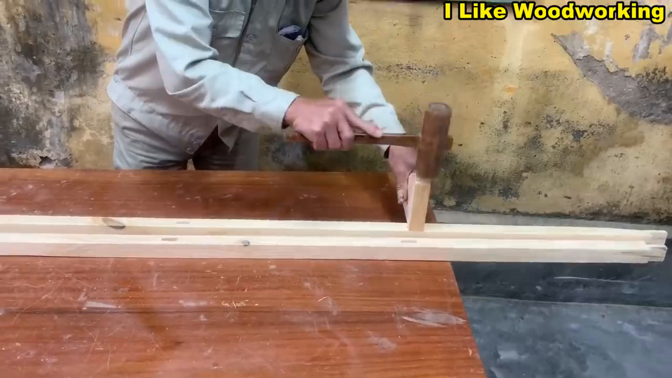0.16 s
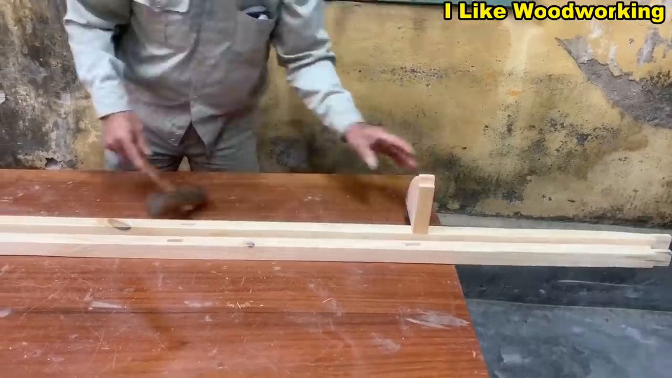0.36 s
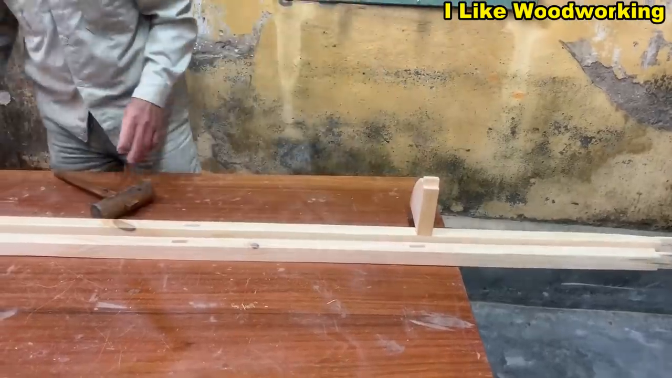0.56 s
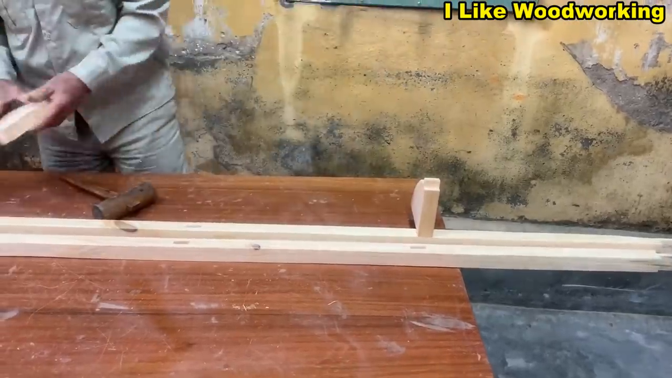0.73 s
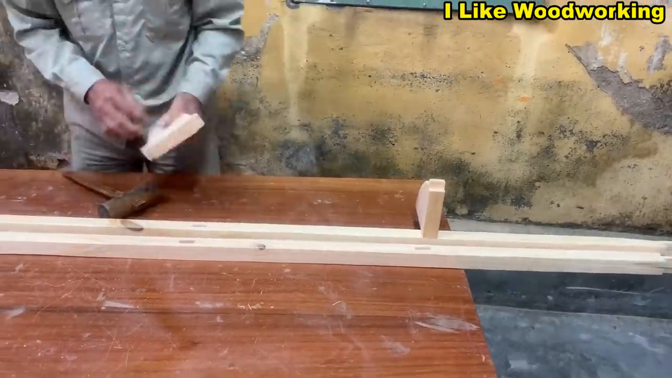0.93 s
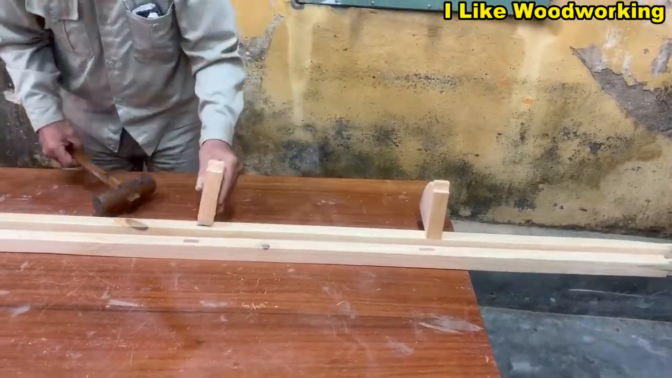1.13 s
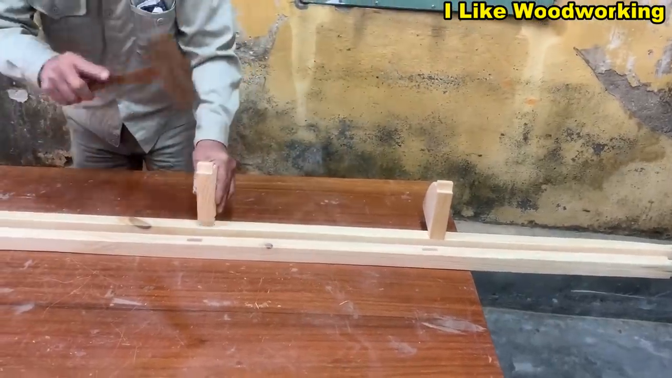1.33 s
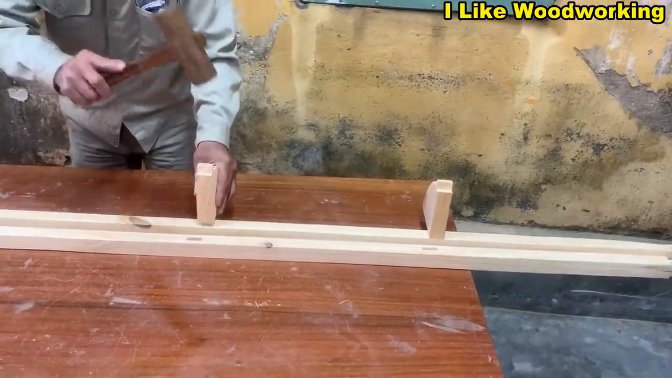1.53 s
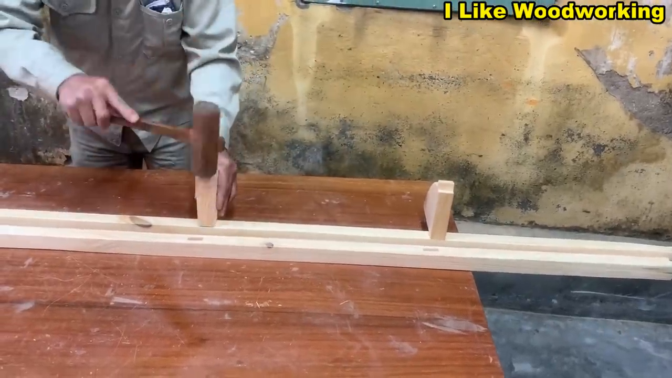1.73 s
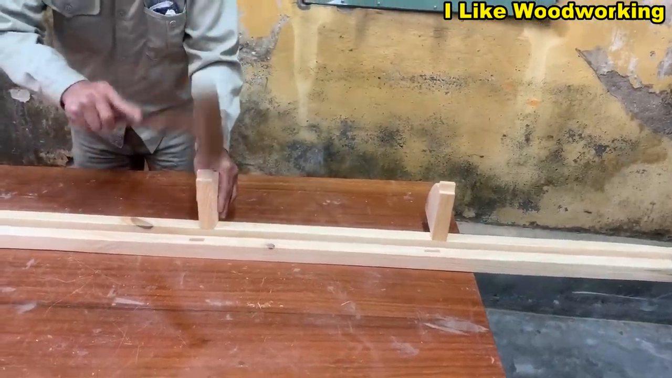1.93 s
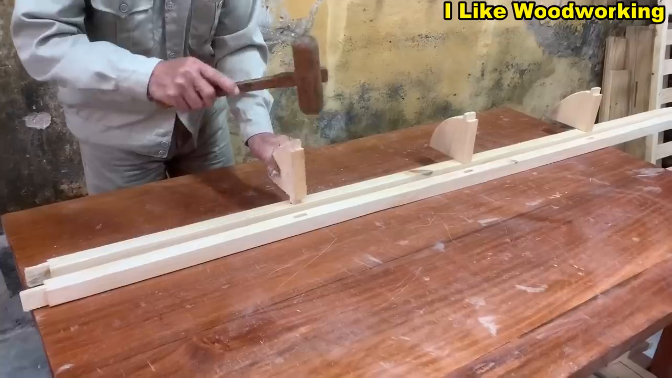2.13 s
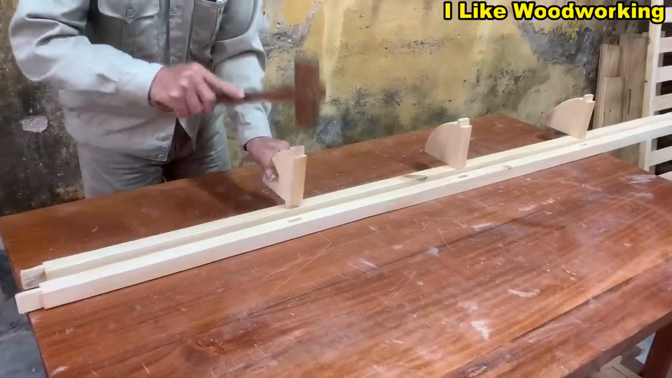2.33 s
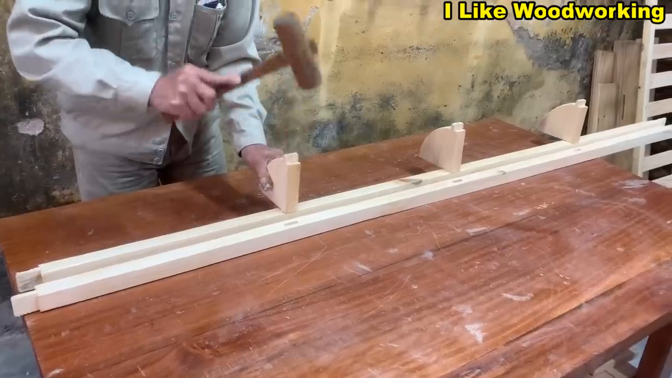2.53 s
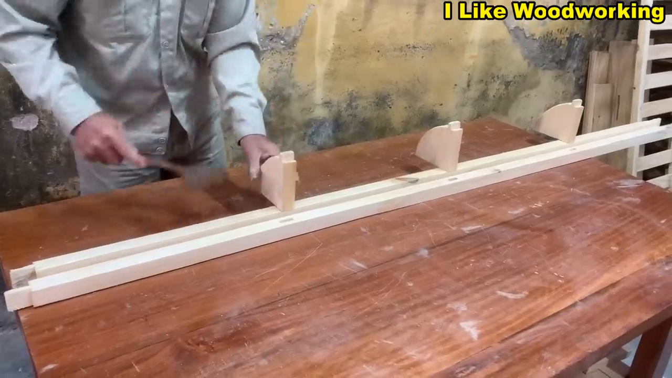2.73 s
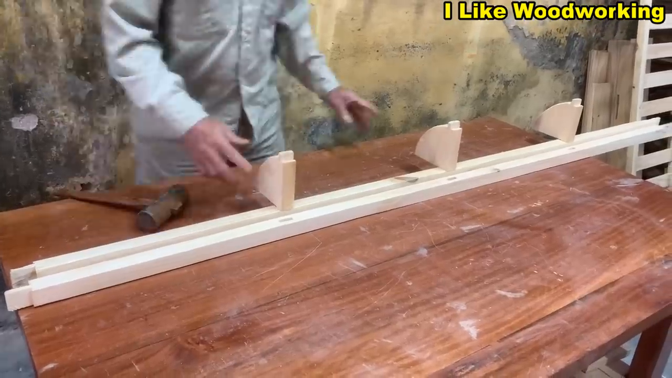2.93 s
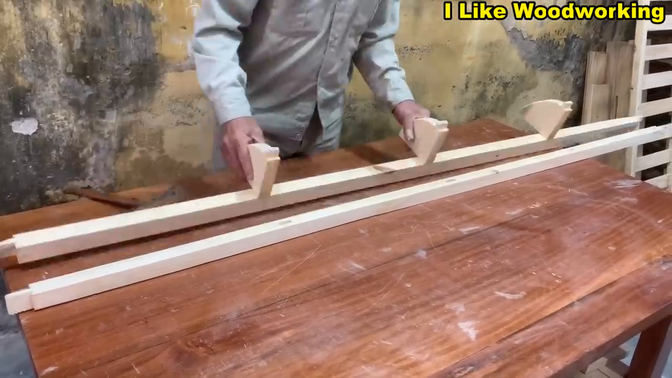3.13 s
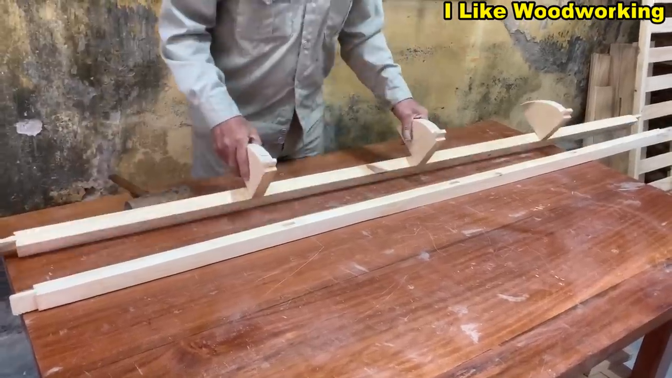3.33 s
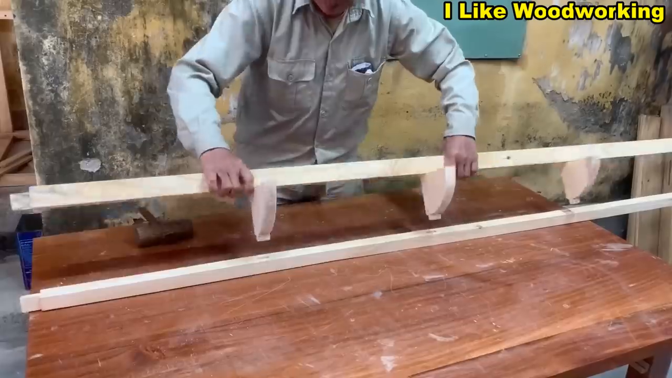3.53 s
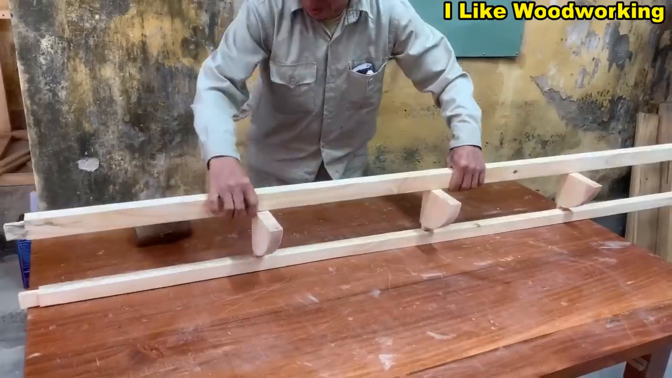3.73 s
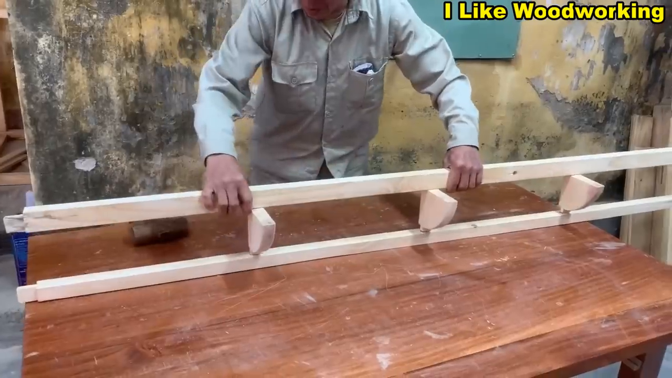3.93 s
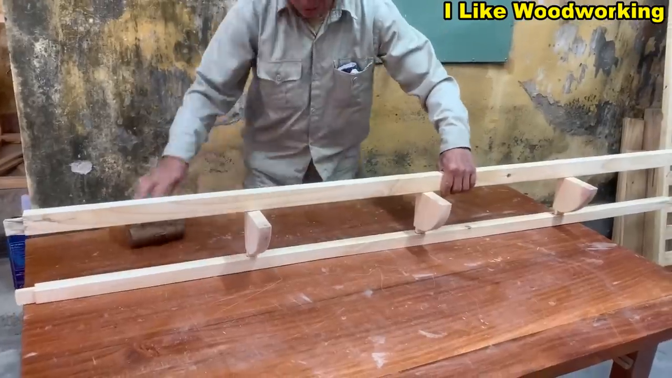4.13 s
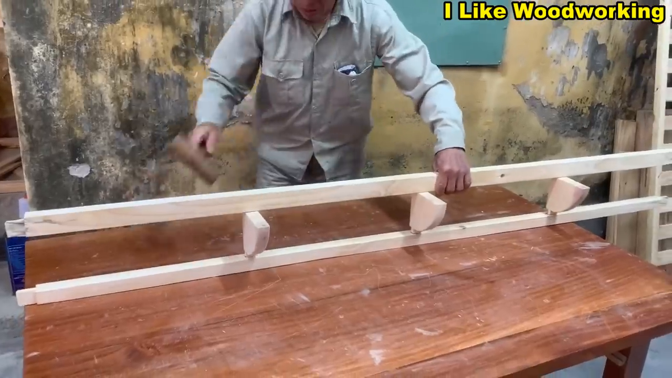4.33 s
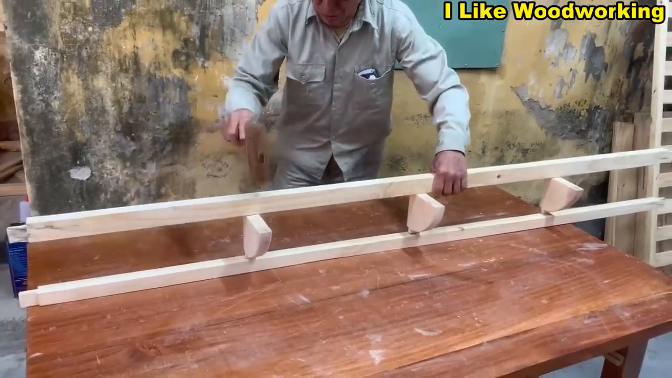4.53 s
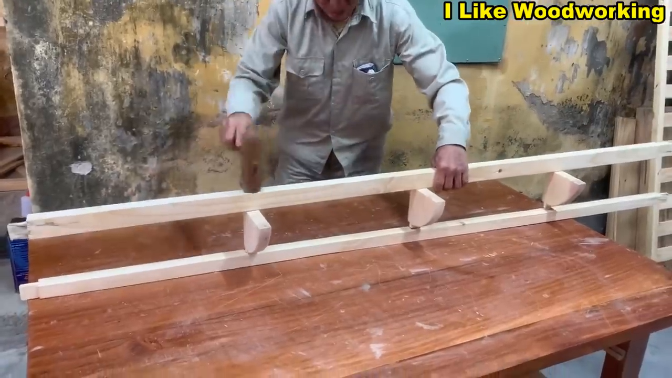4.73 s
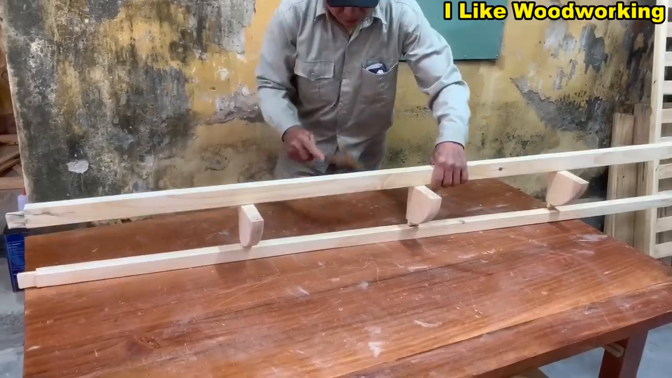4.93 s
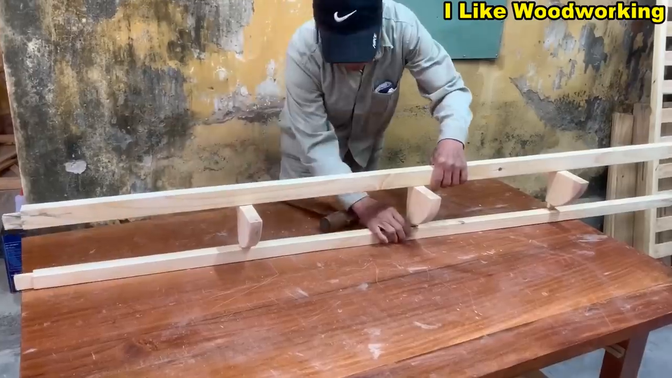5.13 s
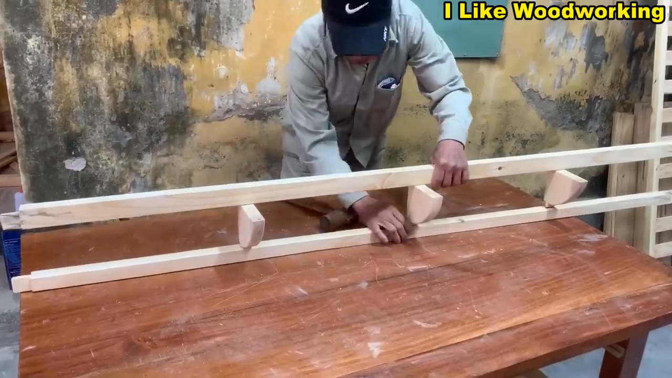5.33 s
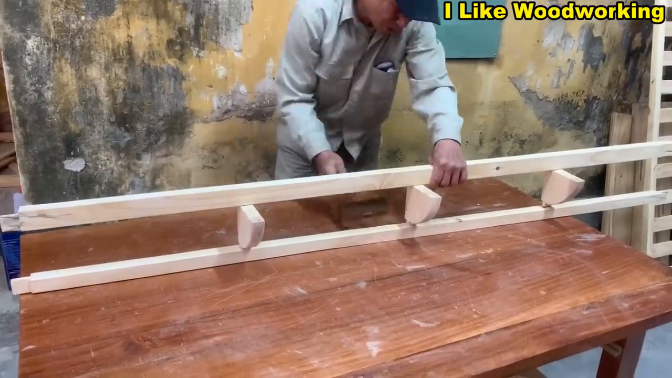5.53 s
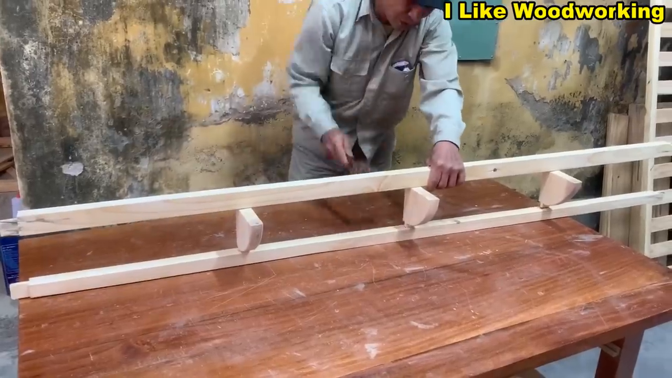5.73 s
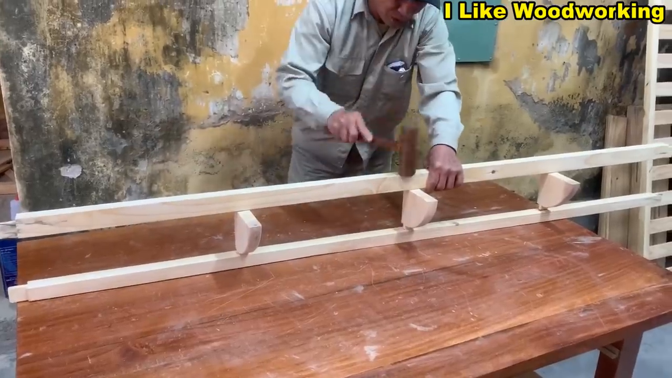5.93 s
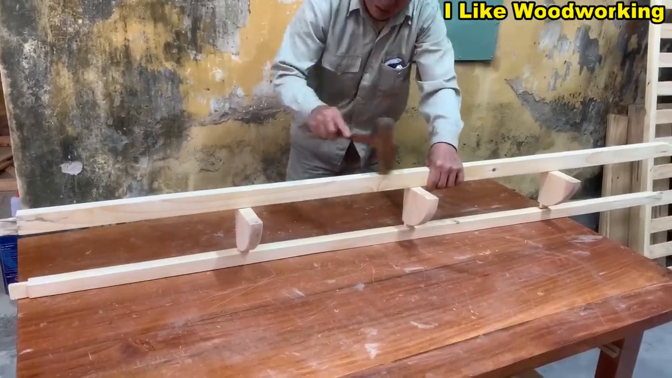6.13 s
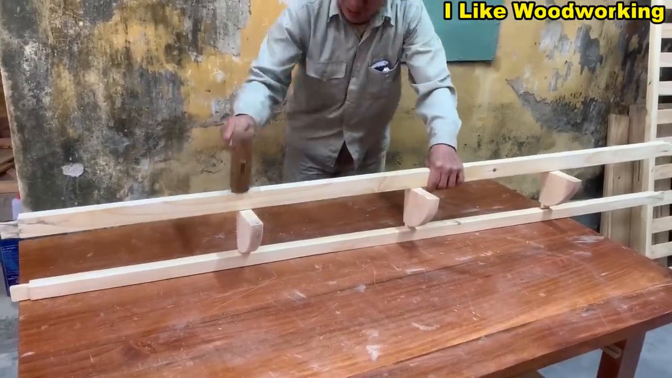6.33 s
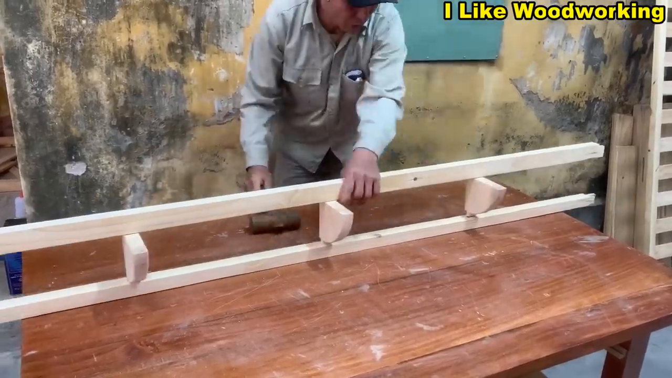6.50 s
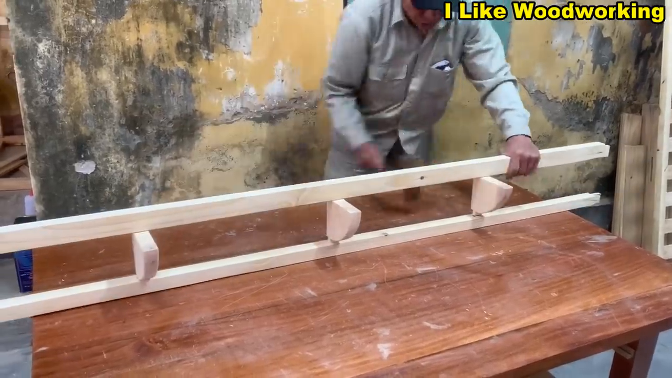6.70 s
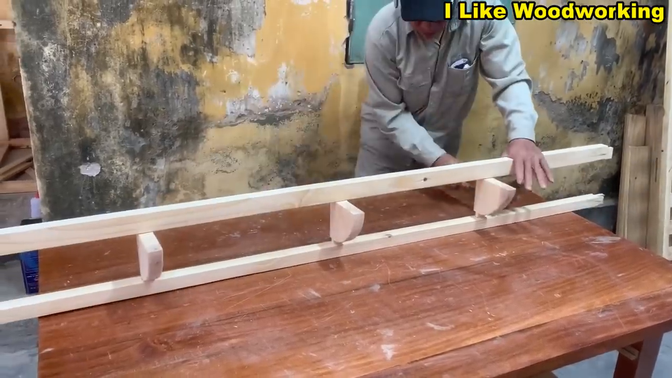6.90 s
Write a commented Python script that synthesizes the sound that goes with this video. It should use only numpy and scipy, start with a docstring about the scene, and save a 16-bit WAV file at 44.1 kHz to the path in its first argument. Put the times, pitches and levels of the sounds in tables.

```python
"""Mallet and pine in a small workshop

Quick bursts of mallet blows drive three pine blocks into a long rail, then tap a second rail onto them.
Each blow is a brief noise contact, modes of the wood ringing on, a bench thump and a short, hard room.
Between bursts the mallet is laid down in hops, and loose pieces knock, click and pat on the bench.
Hands slide, sleeves swish and a block squeaks, all as shaped noise and tones over a quiet, steady air.
Two microphone ports stand close by.
"""
import sys
import numpy as np
from scipy import signal
from scipy.fft import rfft, irfft, next_fast_len
from scipy.io import wavfile

SR = 44100
rng = np.random.default_rng(int(sys.argv[2]) if len(sys.argv) > 2 else 0)


def int16_out(signal):
    """Quantize to a 16-bit WAV file."""
    q = np.round(np.clip(np.atleast_2d(signal).T, -1, 1) * 32767)
    wavfile.write(sys.argv[1], SR, q.astype(np.int16))


N = 306936

# mallet blows: [start_s, level_db]
BLOWS = [(0.0069, -24), (0.0738, -24.5), (0.1411, -25), (0.2066, -23.5), (0.2733, -22.5), (0.3266, -24),
         (1.489, -27), (1.578, -24), (1.6609, -23.5), (1.7412, -22.5), (1.8175, -22), (1.8934, -22.5),
         (1.9638, -24), (2.0329, -21), (2.0801, -22), (2.4055, -24.5), (2.495, -24), (2.5748, -22),
         (2.6474, -21.5), (2.7139, -21.5), (2.758, -26), (4.5976, -19.5), (4.6871, -22.5), (4.7709, -22),
         (4.8395, -22), (5.9333, -21.5), (6.0237, -22), (6.1103, -20.5), (6.1871, -20), (6.3393, -21),
         (6.4157, -21.5)]
# the mallet moves on to another spot at these times (s)
SECOND_END, THIRD_END, RAIL_MOVES = 2.175, 3.5, (5.5, 6.26)

# colour of each place struck: [frequency_hz, level_db_per_hz]
FIRST_BLOCK = [(180, -27.5), (779, 0), (1010, -11.5), (7600, -11), (16000, -22)]
SECOND_BLOCK = [(180, -28.5), (411, -4), (1110, -19.5), (1990, -2), (7990, -1), (16000, -19.5)]
THIRD_BLOCK = [(180, -30), (404, -6), (1340, -18.5), (1650, -3.5), (4720, 1), (8940, -1.5), (16000, -21)]
RAIL_END = [(180, -37), (450, -18.5), (824, -7), (1250, -25), (1810, -30), (6000, -14.5), (16000, -25.5)]
RAIL_MIDDLE = [(180, -33.5), (487, -12), (1750, -13), (8140, -10), (16000, -25)]
BENCH = [(60, -51.5), (200, -23.5), (380, -4), (850, 0), (1400, -7.5), (5500, -11), (16000, -32)]
# modes of the wood, undamped by hands: [pitch_hz, relative_level_db, t60_s]
FIRST_BLOCK_MODES = [(330, -12, .1), (416, -11, .15), (714, -5, .18), (798, 3, .17)]
BLOCK_MODES = [(345, -4, .08), (414, 0, .17), (485, -10, .12), (576, -11, .16), (705, -6, .16)]
RAIL_MODES = [(495, -11, .22), (700, -6, .14), (845, 0, .2), (905, -8, .14), (982, -4, .18),
              (1518, -14, .22)]
RAIL_MIDDLE_MODES = [(416, -1, .15), (495, 0, .15), (845, -4, .2), (1000, -2, .22), (1147, -5, .18),
                     (1529, -7, .19)]
# an upright block sways, pushing air to one port as it pulls it from the other:
# [pitch_hz, relative_level_db, t60_s]
SWAY_MODES = [(892, 0, .09), (1015, -1, .08), (1130, -6, .08), (1296, -5, .11)]
# higher, quickly damped resonances that give each piece its woody note: [pitch_hz]
FIRST_BLOCK_NOTES = [1296, 1554, 2131, 2880, 4900, 6500, 7850]
SECOND_BLOCK_NOTES = [2023, 2550, 3350, 4100, 6600]
THIRD_BLOCK_NOTES = [1600, 2310, 3200, 4750, 8800]
RAIL_NOTES = [1670, 2060, 2820, 4550, 5050, 6200]
# weak spots in the colour of every blow and knock: [frequency_hz]
WEAK_SPOTS = [445, 545, 1830, 3700]

BODY_HZ, CLACK_HZ, CRACK_HZ = (30, 1200), (1200, 4000), (4000, 16500)  # low, middle and top band
RESONANCE_DB, RESONANCE_Q, DIP_DB = 6, 20, -6
CONTACT_S = 0.0015  # the force of a blow peaks after this time
THUMP_DB = -40.5  # the bench, against the blow
SPOT_SHARE = 0.23  # share of the vibration's power that repeats from blow to blow on one spot
LOW_EDGE_HZ, LOW_LOSS_DB = 180, 26  # narrow pieces radiate little bass

# mallet laid down, touching first and then falling flat: [touch_s, landing_s, level_db, body_level_db]
LAYDOWNS = [(0.476, 0.53, -37, -48), (2.882, 2.897, -40, -52.5), (5.079, 5.105, -31, -38.5),
            (6.568, 6.584, -38, -44.5)]
TOUCH_DB, LANDING_CRACK_DB = -4.5, 7  # first touch against the landing; crack against clack
BOUNCE_S, BOUNCE_DB = 0.01, -4  # average time between hops; level change at each

# pieces set down and nudged; a soft contact passes only the lows: [start_s, level_db, contact_cutoff_hz]
KNOCKS = [(3.216, -49.5, 2770), (3.269, -35.5, 3430), (3.327, -50, 3350), (3.349, -49, 2780),
          (3.6, -62.5, 1000), (3.708, -32, 5530), (3.769, -40, 4070), (3.881, -44.5, 5000),
          (3.998, -48.5, 2920), (4.075, -43.5, 3930), (4.126, -39.5, 4200), (4.35, -52, 1670),
          (4.502, -44, 2120), (4.975, -49, 990), (5.345, -41.5, 1300), (5.442, -55, 1440),
          (5.797, -47.5, 1900), (6.77, -48.5, 2600), (6.932, -38, 12400)]
KNOCK_CLACK_DB, KNOCK_CRACK_DB = 0.5, 5  # against the body, for a perfectly hard contact
# hard, dry clicks of wood on wood: [start_s, level_db]
CLICKS = [(5.688, -33.5), (5.742, -32)]
CLICK_BODY_DB, CLICK_CLACK_DB = -9, -9.5  # against the crack
# short, dull pats where hands and wood meet: [start_s, level_db]
PATS = [(4.164, -47.5), (4.227, -59), (4.374, -62), (5.281, -50.5)]
# the loose block is stood on the rail, a single row: [start_s, level_db]
BLOCK_PLACED = (1.209, -60.5)

# hands slide over the pine: [middle_s, length_s, level_db]
SLIDES = [(0.95, 0.13, -70), (3.25, 0.12, -60), (3.9, 0.5, -69), (4.42, 0.51, -60.5), (5.5, 0.42, -61),
          (6.85, 0.22, -61)]
# colour of rubbed pine: [frequency_hz, level_db_per_hz]
RUB_COLOUR = [(50, -21), (200, -2), (400, 3.5), (950, -13), (2000, -8), (6000, -17.5)]
BUMPS_PER_S, BUMP_DB = 61, -0.5  # average rate of catches in sliding wood; bumps against the slide
# quick swishes of a sleeve: [middle_s, level_db]
SWISHES = [(0.696, -61), (4.236, -53), (4.383, -49)]
# colour of the sleeve: [frequency_hz, level_db_per_hz]
RUSTLE_COLOUR = [(800, -30), (3000, -6.5), (9500, 6.5), (16000, -7)]
SWISH_S, SWISH_RUB_DB = 0.02, -25  # length of a swish; its rubbing against its rustle
SLIDE_RUSTLE_DB = -10  # rustle of a slide against its rubbing
# dry sweeps along the rail: [middle_s, length_s, level_db]
SWEEPS = [(5.52, 0.035, -57.5), (5.72, 0.47, -59.5)]
# narrow bands in the hiss of a sweep: [frequency_hz, level_db_per_hz]
SWEEP_COLOUR = [(3020, -38), (5300, -22), (7730, -29), (9100, -9), (10300, -20)]
# fingers squeak on a block as it is picked up: [middle_s, slips_per_s, level_db]
SQUEAK = [(0.915, 975, -67), (0.975, 1020, -66), (1.04, 1055, -69)]

# reverberation of the room: [frequency_hz, t60_s]
ROOM_T60 = [(200, 0.31), (2200, 0.2)]
# the left port hears the lows earlier; its lead levels off at this phase angle (radians)
PORT_LAG_S, PORT_TURN = 0.000078, 0.31
# colour of the steady air: [frequency_hz, level_db_per_hz]
AIR_COLOUR = [(50, -28), (170, 2), (500, -3), (1200, -15), (15000, -29)]
AIR_DB, AIR_ALIKE = -73.5, 0.6  # level; likeness of the two ports
CUTOFF_HZ = 16100

SIZE = 12288  # samples in one blow or knock
AGE = np.arange(SIZE) / SR  # seconds since contact
HZ = np.maximum(np.arange(SIZE // 2 + 1) * SR / SIZE, 1)
EARLY = SR // 50  # levels are set over the first 20 ms


def driving_blocks():
    """Three upright blocks are struck in turn; each sways as well as rings."""
    first = tapping(0, 1, FIRST_BLOCK, FIRST_BLOCK_NOTES, FIRST_BLOCK_MODES,
                    ring_db=-12.0, thud_db=-12.5, clack_db=-14.0, tail_db=-7.5,
                    clack_rise_db=2.1, sway_db=-7.5)
    second = tapping(1, SECOND_END, SECOND_BLOCK, SECOND_BLOCK_NOTES, BLOCK_MODES,
                     ring_db=-13.5, thud_db=-13.5, clack_db=-3.0, tail_db=-8.0,
                     clack_rise_db=-0.63, sway_db=-9.5)
    third = tapping(SECOND_END, THIRD_END, THIRD_BLOCK, THIRD_BLOCK_NOTES, BLOCK_MODES,
                    ring_db=-25.0, thud_db=-19, clack_db=-4.5, tail_db=-8.5,
                    seating_db=1.23, clack_rise_db=-1.5, sway_db=-14)
    return first + stopped(second, SECOND_END) + third


def tapping_rail():
    """The second rail is tapped in three bursts: end colour, middle colour, then end colour again."""
    start = tapping(THIRD_END, RAIL_MOVES[0], RAIL_END, RAIL_NOTES, RAIL_MODES,
                    ring_db=-10.0, thud_db=-8.5, clack_db=-5.5, tail_db=-8.5)
    middle = tapping(*RAIL_MOVES, RAIL_MIDDLE, RAIL_NOTES, RAIL_MIDDLE_MODES,
                     ring_db=-14.5, thud_db=-10, clack_db=-6.0, tail_db=-7.5, seating_db=0.53)
    finish = tapping(RAIL_MOVES[1], N / SR, RAIL_END, RAIL_NOTES, RAIL_MODES,
                     ring_db=-10, thud_db=-3.0, clack_db=-2.0, tail_db=-10.0)
    return start + middle + finish


def tapping(start, end, spectrum, resonances, modes, ring_db, thud_db, clack_db, tail_db,
            seating_db=0, clack_rise_db=0, sway_db=-np.inf, crack_db=1.0):
    """Each blow seats the joint: the next passes seating_db more to the body, in a new fine colour."""
    out = np.zeros((2, N))
    spot = wood_grain()
    share = np.clip(SPOT_SHARE, 0, 1)
    spectrum = [(LOW_EDGE_HZ, spectrum[0][1] - LOW_LOSS_DB), *spectrum]
    blows = [row for row in BLOWS if start <= row[0] < end]
    for k, (s, db) in enumerate(blows):
        grain = np.sqrt(share) * spot + np.sqrt(1 - share) * wood_grain()
        colour = causal(spectrum, resonances, ripple_db=5.5)
        thud = burst(grain[0], colour, BODY_HZ, CONTACT_S, -15, 0.12, tail_db - 5)
        low = from_db(thud_db) * thud + from_db(ring_db) * ringing(modes) + from_db(THUMP_DB) * thump()
        sway = from_db(sway_db) * ringing(SWAY_MODES) * [[1], [-1]]  # opposite sign at the ports
        clack = burst(grain[1], colour, CLACK_HZ, CONTACT_S, -7, 0.075, tail_db + 1)
        crack = burst(grain[2], colour, CRACK_HZ, CONTACT_S, -11, 0.045, tail_db - 2)
        # both bands lean to the right port
        clack = from_db(clack_db + clack_rise_db * k) * clack * from_db([[-2], [2]])
        crack = from_db(crack_db) * crack * from_db([[-1], [1]])
        add(out, s, from_db(db) * (from_db(seating_db * k) * low + sway + clack + crack))
    return out


def burst(grain, colour, band, contact_s, wood_db, wood_t60, room_db, snap_hz=11000):
    """One band of a blow: brief contact, dense ringing of the wood, then the room; early rms 1."""
    contact = (AGE / contact_s * np.exp(1 - AGE / contact_s)) ** 2
    wood = from_db(wood_db - 60 * AGE / wood_t60)
    room_t60 = at_hz(ROOM_T60, np.sqrt(band[0] * band[1]))
    room = from_db(room_db - 60 * AGE / room_t60)
    tail = np.hypot(wood, room) * (1 - np.exp(-AGE / contact_s / 2))
    # the contact is brighter than what rings after it
    bright_contact = rfft(grain * contact) * np.hypot(1, HZ / snap_hz)
    x = irfft((bright_contact + rfft(grain * tail)) * colour)
    x = signal.sosfilt(signal.butter(4, band, "band", fs=SR, output="sos"), x)
    return x / rms(x[:, :EARLY])


def ringing(modes, scatter_db=2.5, detune=0.007, port_spread=0.067, build_s=0.0037, damping=1):
    """Each blow excites the modes with new strengths; the hand's grip shifts them a little; early rms 1."""
    hz, db, t60 = np.transpose(modes)[:, :, None]
    strength, grip = rng.standard_normal((2, len(modes), 1))
    turn = (-1) ** np.arange(len(modes))[:, None]  # modes alternate in sign and in the port they reach first
    phase = 2 * np.pi * hz * (1 + detune * grip) * AGE
    decay = from_db(db + scatter_db * strength - 60 * AGE * damping / t60)
    fade = turn * decay * (1 - np.exp(-AGE / build_s))
    left = (fade * np.sin(phase + port_spread * turn)).sum(0)
    right = (fade * np.sin(phase - port_spread * turn)).sum(0)
    x = np.array([left, right])
    return x / rms(x[:, :EARLY])


def thump(t60=0.084, top_hz=75):
    """The heavy bench gives a little under the blow: a decaying low rumble; early rms 1."""
    push = pair(0, SIZE) * from_db(-60 * AGE / t60)
    x = signal.sosfilt(signal.butter(2, top_hz, fs=SR, output="sos"), push)
    return x / rms(x[:, :EARLY])


def wood_grain(body_alike=0.75, top_alike=0.39):
    """Dense vibration of the wood as the two ports hear it, for body, clack and crack."""
    return np.array([pair(body_alike, SIZE), pair(top_alike, SIZE), pair(top_alike, SIZE)])


def causal(spectrum, resonances, ripple_db):
    """Colour of a spot: slope, resonances and fine ripple; minimum phase, so nothing sounds early."""
    knots = np.arange(0, SR / 2, 170)
    ripple = np.interp(HZ, knots, rng.uniform(-1.5, 1, len(knots)))
    ripple = ripple_db * ripple * HZ / (HZ + BODY_HZ[1])  # weaker in the lows
    db = at_hz(spectrum, HZ) + RESONANCE_DB * bells(resonances) + DIP_DB * bells(WEAK_SPOTS) + ripple
    # folding the cepstrum gives the minimum phase
    cepstrum = irfft(np.log(from_db(db)))
    cepstrum[1:SIZE // 2] *= 2
    cepstrum[SIZE // 2 + 1:] = 0
    return np.exp(rfft(cepstrum))


def bells(centres):
    """Narrow bumps of height 1 on the frequency axis."""
    return sum(1 / (1 + (2 * RESONANCE_Q * np.log(HZ / hz)) ** 2) for hz in centres)


def stopped(x, s):
    """The sound breaks off abruptly, within 10 ms, at time s."""
    return x * np.interp(np.arange(N) / SR, [s - 0.01, s], [1, 0])


def laying_down(count=5):
    """The mallet touches the bench, skips, falls flat with a crack and rattles to rest in quick hops."""
    out = np.zeros((2, N))
    for touch, landing, db, body in LAYDOWNS:
        for s in (touch, touch + 0.6 * (landing - touch)):
            add(out, s, from_db(TOUCH_DB) * knock(body, db, db))
        for k in range(count):
            jitter = min(k, 1) * (rng.random() - 0.5) / 2  # the landing itself is on time
            s = landing + BOUNCE_S * (k + jitter)
            add(out, s, from_db(BOUNCE_DB * k) * knock(body, db, db + LANDING_CRACK_DB))
    return out


def knocking():
    """Blocks and rails are set down, nudged and patted; the softer the contact, the duller the knock."""
    out = np.zeros((2, N))
    for s, db, cutoff in KNOCKS:
        clack_db = db + KNOCK_CLACK_DB + softened(CLACK_HZ, cutoff)
        crack_db = db + KNOCK_CRACK_DB + softened(CRACK_HZ, cutoff)
        add(out, s, knock(db, clack_db, crack_db))
    for s, db in CLICKS:
        add(out, s, knock(db + CLICK_BODY_DB, db + CLICK_CLACK_DB, db, chatter_db=-2.5))
    for s, db in PATS:
        add(out, s, from_db(db) * pat())
    s, db = BLOCK_PLACED
    add(out, s, from_db(db) * knock(0, -1.8, -19))
    return out


def knock(body_db, clack_db, crack_db, ring_db=-2.5, thud_db=-3.5, chatter_db=0):
    """Loose wood meets the bench or the frame and chatters as it settles."""
    grain = wood_grain() * catching(5.3, 350, size=SIZE)
    colour = causal(BENCH, RAIL_NOTES, ripple_db=11.5)
    thud = burst(grain[0], colour, BODY_HZ, 0.003, 3, 0.15, -1)
    ring = ringing(RAIL_MODES, scatter_db=3.0, detune=0.02, damping=1.5)  # hands damp the rail
    low = from_db(thud_db) * thud + from_db(ring_db) * ring
    clack = burst(grain[1], colour, CLACK_HZ, 0.0016, 0.5 + chatter_db, 0.13, -14.5)
    crack = burst(grain[2], colour, CRACK_HZ, 0.0011, -9 + chatter_db, 0.085, -18)
    bright = from_db(clack_db) * clack + from_db(crack_db) * crack
    return from_db(body_db) * low + bright * from_db([[-1], [1]])


def softened(band, cutoff):
    """What a soft contact takes from a band, in dB: a second-order low-pass at the band's centre."""
    return -10 * np.log10(1 + (band[0] * band[1] / cutoff ** 2) ** 2)


def pat(band_hz=(260, 640), t60=0.016):
    """A soft, damped contact: a few cycles of the lows and no ring; early rms 1."""
    push = pair(0.99, SIZE) * from_db(-60 * AGE / t60)
    x = signal.sosfilt(signal.butter(2, band_hz, "band", fs=SR, output="sos"), push)
    return x / rms(x[:, :EARLY])


def handling():
    """Each movement of a hand rubs and jogs the pine and rustles the sleeve."""
    slides = swells(SLIDES)
    swishes = swells([(s, SWISH_S, db) for s, db in SWISHES])
    rub = slides + from_db(SWISH_RUB_DB) * swishes
    rustle = swishes + from_db(SLIDE_RUSTLE_DB) * slides
    wood = rub * catching(5.4, 91) * hiss(RUB_COLOUR, 0.27) + from_db(BUMP_DB) * slides * bumps()
    sleeve = rustle * hiss(RUSTLE_COLOUR, 0.31)
    sweep = swells(SWEEPS) * catching(2.4, 25) * hiss(SWEEP_COLOUR, 0.25)
    # the dry sounds flutter both slowly and finely
    return wood + (sleeve + sweep + squeak()) * catching(3, 90) * catching(5, 600)


def bumps():
    """Sliding wood catches at random; each catch is a small dull knock; rms 1."""
    catches = (rng.random(N) < BUMPS_PER_S / SR) * rng.standard_normal(N)
    bump = knock(body_db=-13.0, clack_db=-10.5, crack_db=-8.5)
    x = signal.fftconvolve(catches[None], bump, axes=1)[:, :N]
    return x / rms(x)


def squeak(length_s=0.035):
    """Skin slips on planed pine in short, broken chirps; the third harmonic leads, the second is weak."""
    s, hz, db = np.transpose(SQUEAK)
    slips_per_s = np.interp(np.arange(N) / SR, s, hz) * catching(0.5, 600)
    phase = 2 * np.pi * np.cumsum(slips_per_s) / SR
    level = swells([(middle, length_s, peak) for middle, peak in zip(s, db)])
    return level * (np.sin(3 * phase) + np.sin(2 * phase) / 3)


def swells(rows):
    """Each movement (middle_s, length_s, level_db) gathers speed and slows again."""
    s, length, db = np.transpose(rows)[:, :, None]
    t = np.arange(0, N, 64) / SR
    # about 6 dB below its peak at either end of its length
    speed = from_db(db) / np.cosh(np.clip((t - s) / length * np.e, -50, 50))
    return np.interp(np.arange(N) / SR, t, speed.sum(0))


def catching(depth_db, per_s, size=N):
    """Loose surfaces catch and let go: an uneven gain."""
    steps = rng.standard_normal(size)
    return from_db(depth_db * np.interp(np.arange(size) / SR * per_s, np.arange(size), steps))


def ports(x):
    """Sound from the bench reaches the two ports out of step."""
    size = next_fast_len(N + SIZE)
    hz = np.arange(size // 2 + 1) * SR / size
    turn = np.minimum(2 * np.pi * PORT_LAG_S * hz, PORT_TURN)
    return irfft(rfft(x, size) * np.exp(1j * turn * np.array([[0.5], [-0.5]])), size)[:, :N]


def air():
    """A quiet, steady bed of coloured noise, partly alike at the two ports."""
    return from_db(AIR_DB) * hiss(AIR_COLOUR, AIR_ALIKE)


def hiss(spectrum, alike):
    """Steady stereo noise of a given colour; rms 1."""
    hz = np.maximum(np.arange(N // 2 + 1) * SR / N, 1)
    x = irfft(rfft(pair(alike, N)) * from_db(at_hz(spectrum, hz)), N)
    return x / rms(x)


def pair(alike, size):
    """White noise at two ports, partly alike."""
    mid, side = rng.standard_normal((2, size))
    alike = np.clip(alike, -1, 1)
    return np.sqrt(1 + alike) * mid + np.sqrt(1 - alike) * side * [[1], [-1]]


def from_db(db):
    """Decibels to amplitude."""
    return 10 ** (np.asarray(db) / 20)


def rms(x):
    """Root-mean-square level over both ports, kept above zero."""
    return np.sqrt(np.mean(x ** 2) + 1e-24)


def at_hz(points, hz):
    """Reads a table on a log-frequency axis."""
    f, value = np.transpose(points)
    return np.interp(np.log(hz), np.log(f), value)


def add(out, s, sound):
    """Mixes a sound in from time s."""
    i = max(round(s * SR), 0)
    out[:, i:i + sound.shape[1]] += sound[:, :N - i]


def scene():
    """Three blocks are driven in, then the rail is tapped home in three bursts, with handling in between."""
    struck = driving_blocks() + tapping_rail()
    loose = laying_down() + knocking()
    return ports(struck + loose) + handling() + air()


def record(dry):
    """The tallest peaks are rounded and the top is cut."""
    rounded = np.tanh(dry)
    top_cut = signal.ellip(10, 0.1, 80, CUTOFF_HZ, fs=SR, output="sos")
    return signal.sosfilt(top_cut, rounded)


dry = scene()
out = record(dry)
int16_out(out)
```